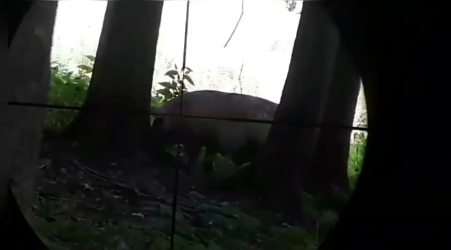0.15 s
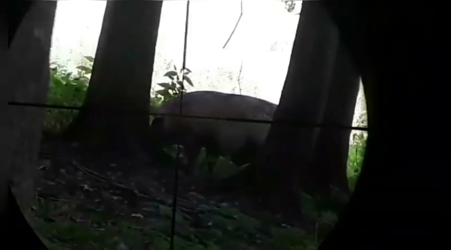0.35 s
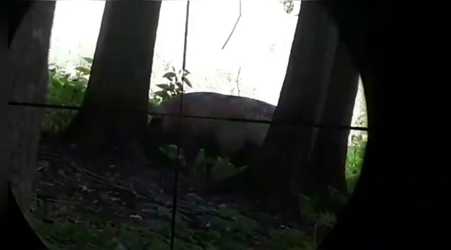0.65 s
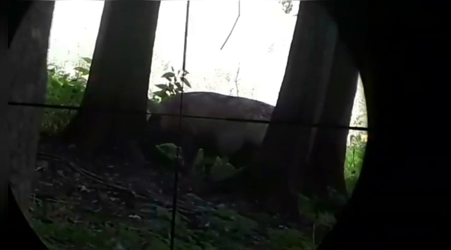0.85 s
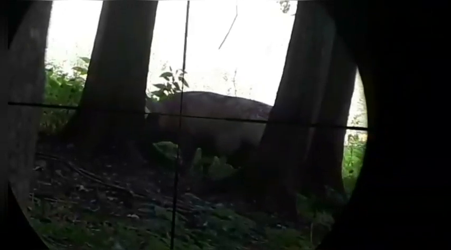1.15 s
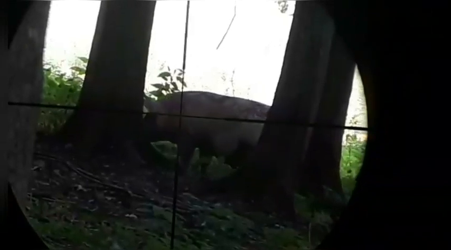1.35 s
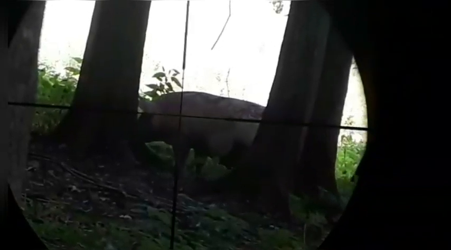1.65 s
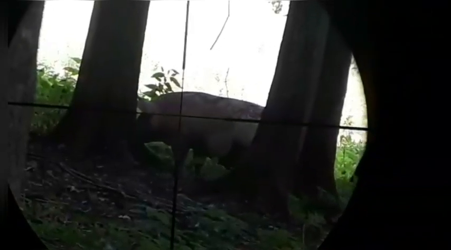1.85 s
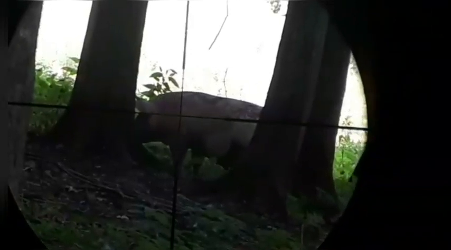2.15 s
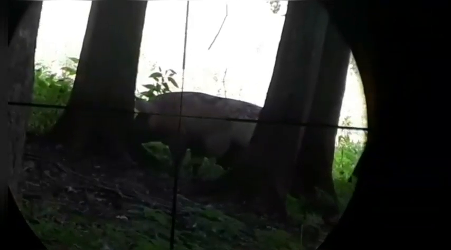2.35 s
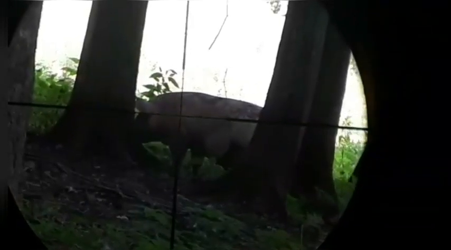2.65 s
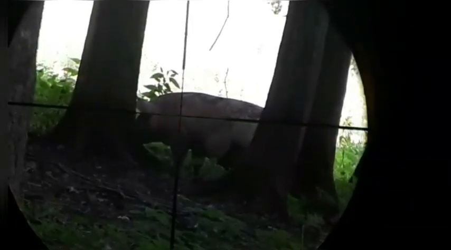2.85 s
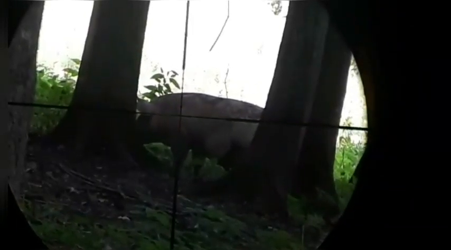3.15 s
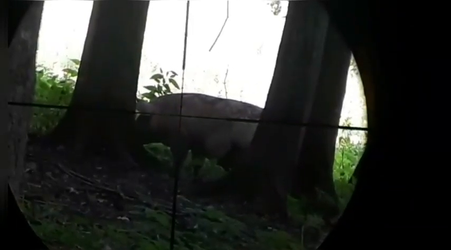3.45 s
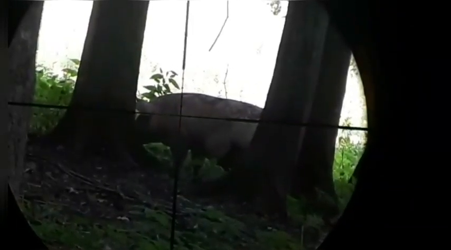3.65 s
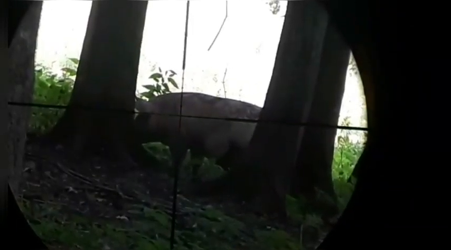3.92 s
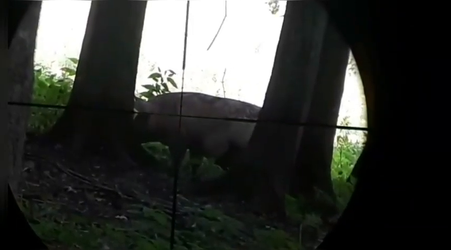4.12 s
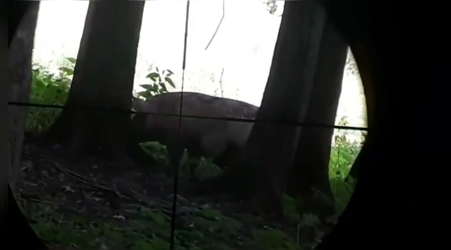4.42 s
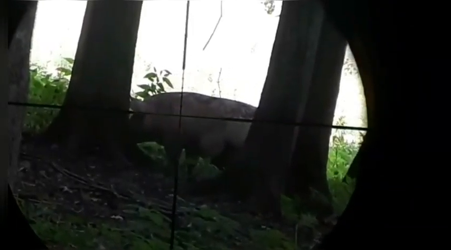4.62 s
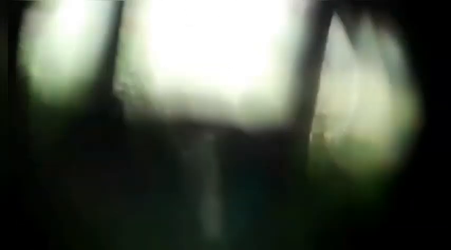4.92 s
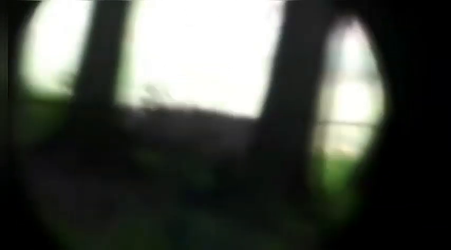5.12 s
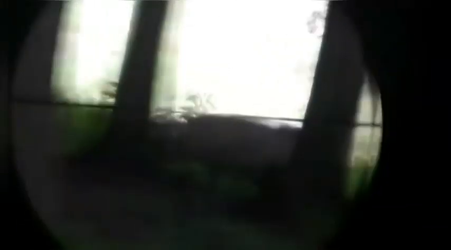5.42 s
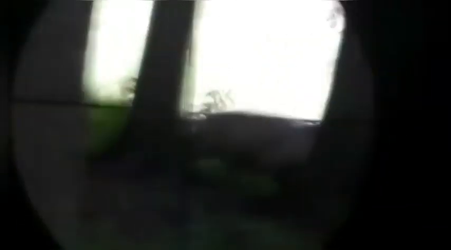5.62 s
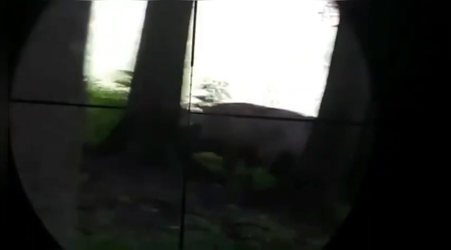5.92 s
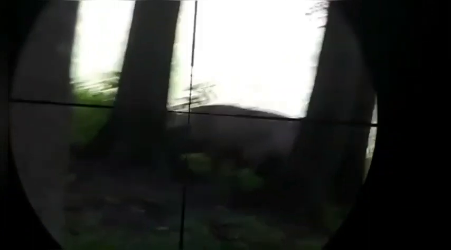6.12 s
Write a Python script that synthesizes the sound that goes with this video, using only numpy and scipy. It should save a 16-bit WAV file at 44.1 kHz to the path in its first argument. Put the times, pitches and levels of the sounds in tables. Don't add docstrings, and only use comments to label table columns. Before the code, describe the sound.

Faint stuttering handling clicks in a very quiet wood, then a crossbow's roaring shot repeats in slow-motion bursts and rattles away in thuds.

```python
import sys
import numpy as np
from scipy import signal
from scipy.io import wavfile
from scipy.ndimage import uniform_filter1d

SR = 44100
rng = np.random.default_rng(int(sys.argv[2]) if len(sys.argv) > 2 else 0)


def generate_wav(sig):
    pcm = np.round(np.clip(np.atleast_2d(sig).T, -1, 1) * 32767).astype(np.int16)
    wavfile.write(sys.argv[1], SR, pcm)


def boost(x):
    u = np.asarray(x, float) / 20
    return 10 ** u


N = 276869
TRUE_N = round(1.8 * SR)
MOUNT_PAN_DB = -5.0


def evened(x):
    return x / np.sqrt(np.mean(x ** 2) + 1e-20)


def read(points, hz):
    f, value = np.transpose(points)
    return np.interp(np.log(hz + 1), np.log(f + 1), value)


def add(mix, start_s, sound, pan_db):
    part = mix[:, round(start_s * SR):][:, :len(sound)]
    part += boost(np.array([[pan_db], [-pan_db]]) / 2) * sound[:part.shape[1]]


def ring(modes, detune=0., rise_cycles=.8):
    t = np.arange(SR // 2) / SR
    x = 0
    for hz, db, t60 in modes:
        turns = hz * (1 + detune * rng.standard_normal()) * t
        envelope = boost(db - 60 * t / t60) * (1 - np.exp(-(turns / rise_cycles) ** 2))
        x = x + envelope * np.sin(2 * np.pi * (turns + rng.random()))
    return x / abs(x).max()


def scrape(ms):
    t = np.arange(SR // 50) / SR
    x = rng.standard_normal(len(t)) * np.exp(-2000 * t / max(ms, .1))
    return x / np.linalg.norm(x)


def noise(tone, same, lean_db, patchy_db):
    hz = np.fft.rfftfreq(2048, 1 / SR)[:, None]
    a, b, c, d, patches = rng.standard_normal((TRUE_N // 512 + 5, 1025, 5)).T
    patches = uniform_filter1d(patches, size=20, axis=0)
    patches = evened(uniform_filter1d(patches, size=3, axis=1))
    same = np.clip(read(same, hz), -1, 1)
    lean = boost(read(lean_db, hz) / 2)
    left = a + 1j * b
    right = same * left + np.sqrt(1 - same ** 2) * (c + 1j * d)
    z = np.array([lean * left, right / lean])
    z *= boost(read(tone, hz) + patchy_db * patches)
    return evened(signal.istft(z, nperseg=2048, noverlap=1536)[1][:, :TRUE_N])


def hits(rows, modes, detune):
    out = np.zeros((2, TRUE_N))
    for start_s, db, ms, pan_db in rows:
        hit = signal.fftconvolve(scrape(ms), ring(modes, detune))
        add(out, start_s, boost(db) * hit / abs(hit).max(), pan_db)
    return out


# pitch_hz, level_db (per Hz)
WOOD_TONE = [(15, -40.5), (40, -38), (92, 1), (130, -7), (200, -14.5), (290, -25), (600, -32.5),
             (4300, -41.5), (5100, -21.5), (5750, -30.5), (6800, -19.5), (7600, -27), (9000, -41.5),
             (16000, -43)]
# pitch_hz, likeness
WOOD_SAME = [(60, 1), (240, 0.96), (950, 0.29), (3770, 0.89), (15000, 0.62)]
# pitch_hz, pan_db
WOOD_LEAN = [(60, 0.55), (240, 0.27), (950, 0.51), (3770, 0.92), (15000, 0.49)]


def wood():
    duck_db = -9 * (np.arange(TRUE_N) > RUSH[2][0] * SR)
    return boost(-60.5 + duck_db) * noise(WOOD_TONE, WOOD_SAME, WOOD_LEAN, patchy_db=-2.0)


# pitch_hz, level_db, t60_s
CATCH_MODES = [(515, -38, 0.28), (545, -37, 0.29), (900, -17, .01), (1913, -9, 0.023), (1900, -24, 0.11),
               (2340, -4, 0.014), (2780, -5, 0.013), (3240, -4.5, 0.0062), (4400, -5, 0.0077),
               (5010, -7.5, .01), (7000, -7.5, 0.0064), (10940, -13.5, 0.0044)]
# start_s, level_db, scrape_ms, pan_db
CATCH_HITS = [
    (.0712, -42, 12, -7),
    (.0745, -32, 0.68, 1.5),
    (.0776, -32.5, 1.9, -5),
    (.081, -53.5, 4.6, -25),
]


def catch():
    return hits(CATCH_HITS, CATCH_MODES, 0.018)


# pitch_hz, t60_s
TREE_DECAY = [(100, 0.38), (400, 0.64), (1500, 0.17), (4000, 0.44), (8000, 0.17), (15000, 0.35)]


def trees(x):
    taps = np.zeros((2, SR // 2))
    at = np.arange(300, SR // 2 - 20, 20) + rng.integers(0, 20, (2, (SR // 2 - 301) // 20))
    np.put_along_axis(taps, at, rng.choice([-1., 1.], at.shape), 1)
    hz, t, z = signal.stft(taps, SR, nperseg=256)
    decay = boost(-60 * t / read(TREE_DECAY, hz)[:, None])
    tail = signal.istft(z * decay, SR, nperseg=256)[1]
    tail = tail / np.linalg.norm(tail[0])
    return signal.fftconvolve(x.mean(0)[None], tail, axes=1)[:, :TRUE_N]


# pitch_hz, level_db, t60_s
GRIP_MODES = [(500, -18.5, 0.026), (950, -11.5, .012), (1450, -12, 0.014), (1960, -3.5, 0.013),
              (2453, -2.5, 0.013), (2884, -3, 0.011), (3460, -2.5, 0.0088), (4040, -7, .006),
              (6060, -20, 0.0056), (10200, -22, .004)]
# start_s, level_db, scrape_ms, pan_db
GRIP_HITS = [
    (.209, -59, 1.7, -6),
    (.2113, -38.5, 4, -3),
    (.2167, -45, 1.2, -15),
    (.2185, -34.5, 7.3, 1),
    (.2208, -51.5, 3.5, -15),
    (.2245, -54, 5.4, -5),
    (.3553, -45.5, 4, -1),
    (.3615, -45, 2.1, -5),
    (.365, -55, 4.1, -4),
]


def grip():
    return hits(GRIP_HITS, GRIP_MODES, 0.028)


# pitch_hz, level_db, t60_s
SAFETY_MODES = [(406, -10.5, 0.045), (617, -13, .03), (904, -12, .03), (1178, -5.5, 0.034),
                (1250, -21, 0.17), (1500, -1, 0.034), (1873, -1, 0.023), (2210, -12.5, 0.021),
                (2900, -20.5, 0.011)]
# start_s, level_db, scrape_ms, pan_db
SAFETY_HITS = [
    (.8952, -35.5, 5.7, -3.5),
    (.9, -42.5, 3.7, -12),
    (.909, -58, 3, -3),
    (.9236, -54, 3.3, -6),
]


def safety():
    return hits(SAFETY_HITS, SAFETY_MODES, 0.0028)


# start_s, level_db, scrape_ms, pitch_hz, t60_s
SPRINGS_AT = [
    (.897, -45, 4, 300, .05),
    (.92, -60, 9, 380, .08),
    (.905, -64, 9, 1230, .1),
    (.9422, -57, 1.5, 2450, .012),
    (1.24, -55, 6, 1550, .03),
    (1.238, -73, 12, 3800, .03),
    (1.255, -70, 15, 3750, .03),
    (1.272, -70, 15, 3800, .03),
    (1.289, -58, 5, 9000, .02),
]
# pitch_hz, pan_db
SPRING_PAN = [(2500, -6), (3700, 1.5)]


def springs():
    out = np.zeros((2, TRUE_N))
    for start_s, db, ms, hz, t60 in SPRINGS_AT:
        out += hits([(start_s, db, ms, read(SPRING_PAN, hz))], [(hz, 0, t60)], 0.)
    return out


# pitch_hz, level_db, t60_s
TRIGGER_MODES = [(144.4, -10, 0.2), (200, -10, .1), (270, -8, 0.28), (332, -11, .06), (395, -10.5, 0.064),
                 (505, -12.5, 0.3), (613, -7.5, 0.032), (800, -1, .025), (1050, -4, 0.022),
                 (1160, -23.5, 0.25), (1417, -4, 0.017), (1961, -6.5, 0.013), (2450, -13, 0.013)]
# start_s, level_db, scrape_ms, pan_db
TRIGGER_HITS = [
    (1.1905, -33, 8.7, -6.5),
    (1.197, -37, 3, -1.5),
    (1.203, -46.5, 24, -5),
    (1.288, -44, 6.8, -19),
]


def trigger():
    return hits(TRIGGER_HITS, TRIGGER_MODES, 0.0046)


# start_s, level_db
RUSH = [
    (1.2945, -52),
    (1.2968, -36),
    (1.2978, -15),
    (1.303, -11),
    (1.3255, -11.5),
    (1.329, -6),
    (1.3325, -14),
]
# start_s, level_db
RATTLE_KNEE = (1.3977, -29.5)
# pitch_hz, level_db (per Hz)
RUSH_TONE = [(15, -52.5), (60, -2), (384, 5), (818, 1.5), (1290, -2), (1610, -6.5), (2220, -3.5),
             (3520, -9.5), (3920, -10.5), (14800, -23), (16000, -74.5)]
# pitch_hz, width_hz, level_db
RAIL = [(1260, 70, -1), (1420, 70, -3), (1890, 90, -3), (2240, 50, -2), (3800, 120, -14), (14800, 500, -16)]


def rush():
    treble_db, dulling_db_per_s, dullest_db = 1.5, 133.5, -8
    rattle_fade_db_per_s = 128.5
    same = [(50, 0.13), (200, 0.7), (2000, 0.79), (5000, 0.25), (15000, 0.41)]
    lean_db = [(50, 1.0), (150, -5.5), (2000, -3.5), (6000, 0.0)]
    roar = noise(RUSH_TONE, same, lean_db, patchy_db=-0.5)
    grit = rng.standard_normal(TRUE_N)
    rail = 0
    for hz, width_hz, db in RAIL:
        resonance = signal.lfilter(*signal.iirpeak(hz, hz / width_hz, SR), grit)
        rail = rail + boost(db - 11.0) * evened(resonance)
    flutter_db = 1.8 * evened(uniform_filter1d(rng.standard_normal(TRUE_N), size=60))
    s, db = np.transpose(RUSH + [RATTLE_KNEE])
    t = np.arange(TRUE_N) / SR
    level_db = np.interp(t, s, db, left=-200) - rattle_fade_db_per_s * np.maximum(t - s[-1], 0)
    sunk_db = dulling_db_per_s * np.maximum(t - RUSH[-1][0], 0)
    treble = boost(np.maximum(treble_db - sunk_db, dullest_db))
    dull = signal.sosfiltfilt(signal.butter(2, 5500, fs=SR, output="sos"), roar)
    return (dull + (roar - dull + rail) * treble) * boost(level_db + flutter_db)


# pitch_hz, level_db, t60_s
BOW_MODES = [(30, 3, 0.12), (82.3, 0.5, 0.2), (192, -2.5, .13), (270.3, -3, 0.56), (362, -6, 0.86),
             (404, -10.5, .5), (549.4, -12.5, 0.59), (627, -12.5, 0.51)]


def recoil():
    out = np.zeros((2, TRUE_N))
    add(out, RUSH[3][0] + 0.00309, boost(-13) * ring(BOW_MODES), MOUNT_PAN_DB)
    return out


# start_s, level_db, pan_db
SLAPS = [(1.3209, -7, -1), (1.3294, -10.5, 1.3), (1.338, -22, -0.5), (1.343, -31, -5.5),
         (1.3511, -16.5, -6.0), (1.3683, -14, -5.5), (1.3725, -25.5, -6), (1.3836, -19.5, -1.5),
         (1.3969, -12.5, -6.0), (1.4133, -22.5, -2), (1.4173, -35, -7.5), (1.4643, -43, -4),
         (1.479, -28.5, 3.5), (1.4823, -38, 3.5), (1.498, -39, 2.0), (1.4997, -45, 2.5)]
# pitch_hz, level_db, t60_s
METAL_MODES = [(2880, 3, .006), (3900, 12.5, .008), (5460, 4, .006), (7500, 7, 0.01), (9700, -25.5, 0.002)]
# pitch_hz, level_db, t60_s
PORT_MODE = [(15800, 0, .012)]


def slaps(crack_db=5.0, ring_db=-9, port_db=-12):
    out = np.zeros((2, TRUE_N))
    thin = signal.butter(1, [1700, 6500], "band", fs=SR, output="sos")
    for start_s, db, pan_db in SLAPS:
        shared, own = scrape(.7), scrape(1.2)
        for side in (1, -1):
            crack = signal.sosfilt(thin, shared + 0.37 * side * own)
            crack = boost(db + crack_db) * crack / abs(crack).max() / 2
            add(out, start_s - .0002, crack, pan_db + 12 * side)
    metal = hits([(s, db + ring_db, 2.5, pan) for s, db, pan in SLAPS], METAL_MODES, 0.045)
    port = hits([(s, db + port_db, 1.5, pan) for s, db, pan in SLAPS], PORT_MODE, 0.00505)
    return out + metal + port


THUDS = [1.3351, 1.3459, 1.3564, 1.3682, 1.3849, 1.3945, 1.4104, 1.4211, 1.4428, 1.4548, 1.4694, 1.502,
         1.5245, 1.5357, 1.5587, 1.5702, 1.5913, 1.5987, 1.6118, 1.6198, 1.6422, 1.6527]
# pitch_hz, level_db, t60_s
STOCK_MODES = [(129, -8, 0.07), (207, 0.5, 0.036), (271, 8, 0.031), (359, -0.5, 0.035), (403, 4, 0.027),
               (547, -0.5, 0.032), (626, -1, 0.035), (786, -1.5, 0.018), (920, -21.5, 0.022)]


def thuds():
    first_db, fade_db_per_s, top_db = -4.5, 125.5, -9
    swing_period_s, swing_peak_s, swing_db = .034, 1.5025, 4
    out = np.zeros((2, TRUE_N))
    for start_s in THUDS:
        db = min(first_db - fade_db_per_s * (start_s - THUDS[0]), top_db)
        db += swing_db * np.cos(2 * np.pi * (start_s - swing_peak_s) / swing_period_s)
        add(out, start_s - .003, boost(db - 1) * ring(STOCK_MODES, detune=.02), MOUNT_PAN_DB + .7)
    return out


# start_s, level_db
KNOCKS = [(1.3507, -6.5), (1.3602, -9.5), (1.3837, -13.5), (1.3978, -32), (1.4154, -30), (1.4189, -13.5),
          (1.4341, -11.5), (1.4465, -42), (1.4539, -37), (1.4656, -21), (1.481, -31), (1.5013, -22),
          (1.5185, -45), (1.534, -32.5), (1.5535, -48), (1.5706, -42), (1.5905, -55.5)]


def knocks(width_ms=0.18):
    rebound_s, first_rebound_db, settling_db_per_s = .0063, -11, 73
    out = np.zeros((2, TRUE_N))
    u = np.arange(-200, 400) / SR * 1000 / width_ms
    swing = (u ** 2 - 1) * np.exp(-u ** 2 / 2) - .8 * np.exp(-5 * u ** 2)
    for s, db in KNOCKS:
        start_s = s - 200 / SR
        add(out, start_s, boost(db) * swing, MOUNT_PAN_DB)
        rebound_db = first_rebound_db - settling_db_per_s * (s - KNOCKS[0][0])
        add(out, start_s + rebound_s, boost(db + rebound_db) * swing, MOUNT_PAN_DB)
    return out


def scene():
    hands = catch() + grip() + safety() + springs() + trigger()
    airborne = rush() + slaps() + hands
    mounted = recoil() + thuds() + knocks()
    echoes = boost(-20.0) * trees(airborne + 0.5 * hands)
    return np.pad(airborne + mounted + echoes + wood(), ((0, 0), (0, N - TRUE_N)))


# splice_number, slip_ms
SPLICE_SLIPS = [(0, .17), (1, 6.48), (2, -6.14), (3, 10.24), (4, -8.12), (5, 5.36), (6, 2.83), (7, -3.53),
                (8, 9.56), (9, -8.98), (10, -2.46), (11, -5.58), (26, -3.27), (27, 4.27), (28, 10.33),
                (29, -11.13), (30, -2.77),
                (35, -5.64), (36, -1.3), (37, 2.5), (38, -5.45), (39, -1.31), (40, -2.95), (41, -3.73),
              (42, 7.19), (43, -7.52), (44, -10.91), (45, 1.89), (46, -5.13), (47, 4.99), (48, -2.55),
              (49, -.75), (50, -2.21), (51, 7.55), (52, -2.12)]


def slowed(sound, slower=4, splices=53, search_ms=11):
    piece_s, first_s, fade_s, lead_s = .1192, .0198, .008, .1
    n = np.arange(N)
    starts = np.round((first_s + piece_s * np.arange(splices)) * SR)
    slip_ms = np.append(0, rng.uniform(-search_ms, search_ms, splices))
    for splice, ms in SPLICE_SLIPS:
        slip_ms[splice + 1] = ms
    jump_s = piece_s * (1 - 1 / slower)
    back_s = jump_s * np.arange(splices + 1) - lead_s + slip_ms / 1000
    back = np.round(back_s * SR).astype(int)
    piece = np.searchsorted(starts, n, "right")
    old = np.maximum(piece - 1, 0)
    fade = np.clip((n - starts[piece - 1]) / (fade_s * SR), 0, 1) ** (piece > 0)
    return fade * sound[:, n - back[piece]] + (1 - fade) * sound[:, n - back[old]]


def band_limit(x):
    return signal.sosfilt(signal.butter(12, 16270, fs=SR, output="sos"), x)


def record(dry):
    overloaded = 1.05 * np.tanh(dry / 1.05)
    loud = signal.sosfiltfilt(signal.butter(8, 15800, fs=SR, output="sos"), overloaded)
    mix = np.clip(slowed(loud), -1, 1)
    return band_limit(mix)


dry = scene()
out = record(dry)
generate_wav(out)
```